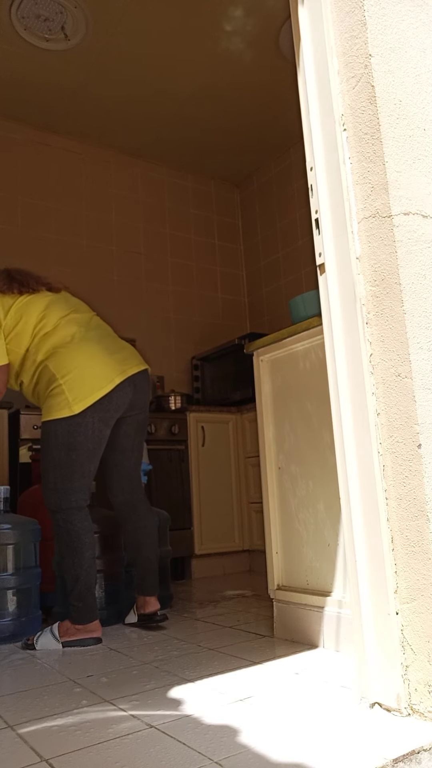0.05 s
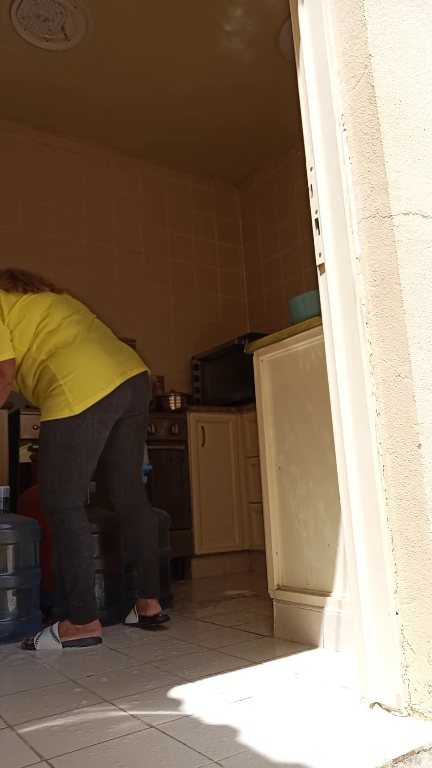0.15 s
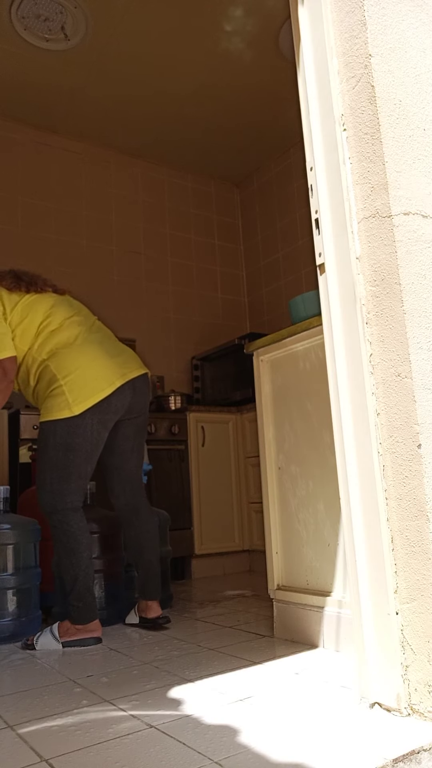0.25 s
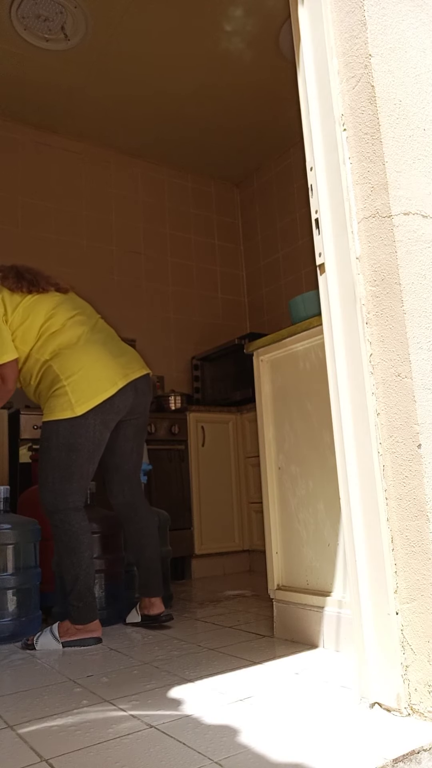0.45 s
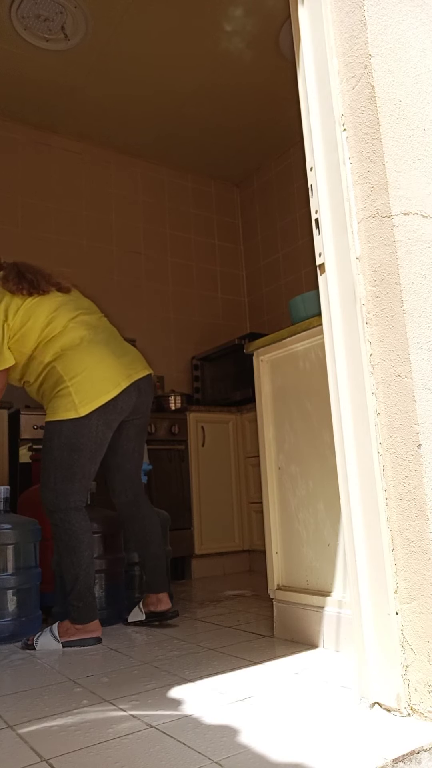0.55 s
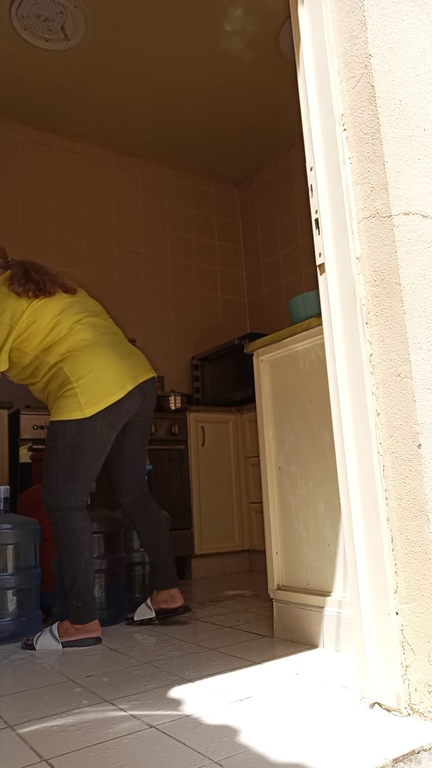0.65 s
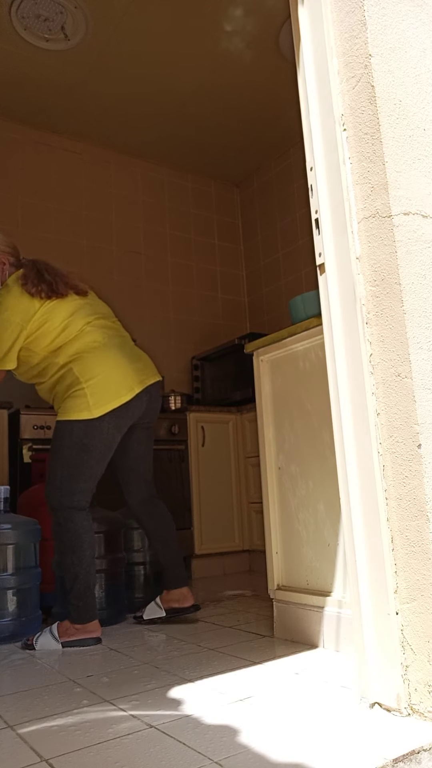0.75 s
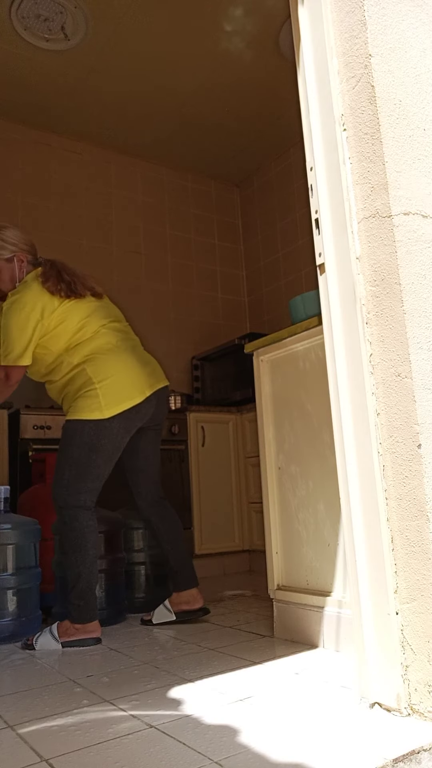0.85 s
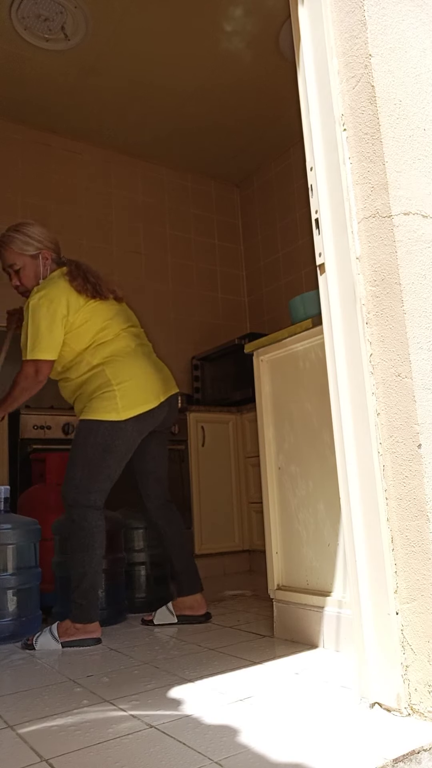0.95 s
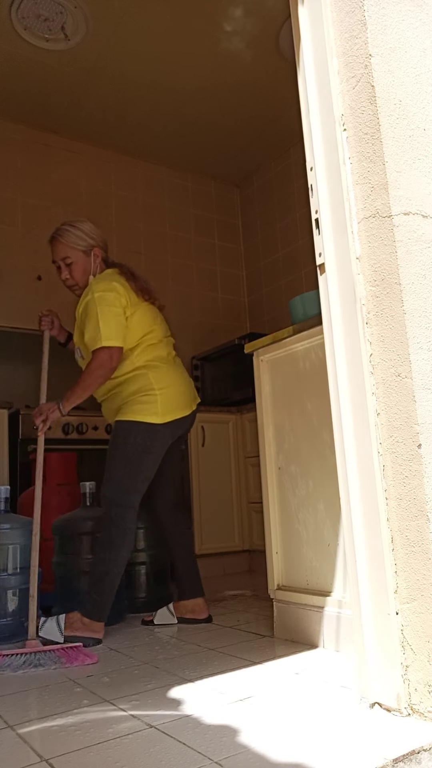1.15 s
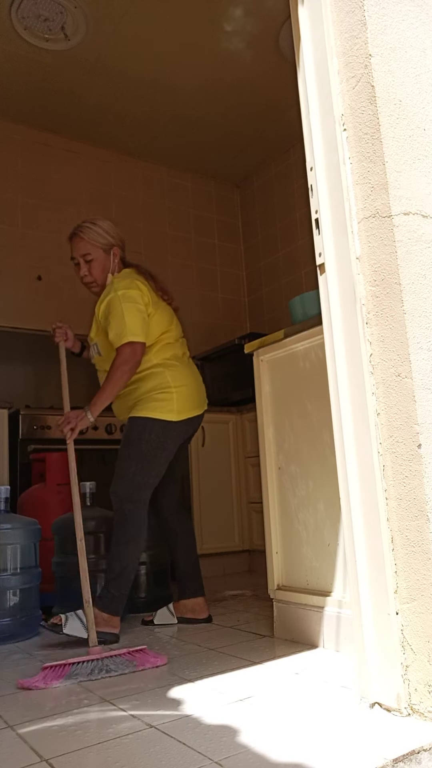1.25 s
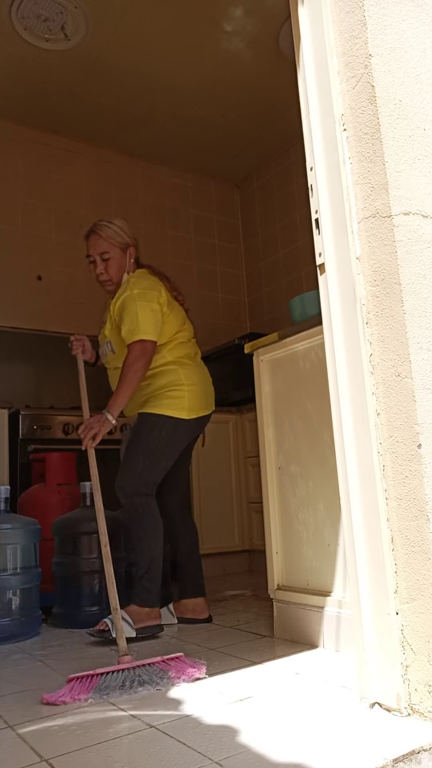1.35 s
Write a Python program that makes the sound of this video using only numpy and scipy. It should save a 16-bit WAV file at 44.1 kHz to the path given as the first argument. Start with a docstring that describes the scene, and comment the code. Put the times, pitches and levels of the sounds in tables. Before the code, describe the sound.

One hard, hollow knock, probably a broom striking a cabinet, lands at about 0.25 seconds and echoes through a tiled kitchen for half a second. Quiet sweeping and soft thuds surround it. A faint squeak comes near 0.75 seconds; the swish dips, then returns with light thuds and scuffs around 1.2 seconds. An appliance hum and hiss continue throughout, with nearly everything heard on the left.

```python
"""In a tiled kitchen, bristles swish over the floor above an appliance hum and hiss, with soft thuds.
At 0.25 s comes one hard, hollow knock, probably the broom head striking a cabinet: the panel rings
and the room answers with a long flutter. Near 0.75 s there is a faint squeak and another thud.
The swish dips briefly, then returns with more thuds and scuffs. All along, the right microphone
is muffled, so nearly everything is heard on the left."""
import sys
import numpy as np
from scipy import signal
from scipy.fft import rfft, irfft
from scipy.io import wavfile
from scipy.ndimage import uniform_filter1d

SR = 44100
rng = np.random.default_rng(int(sys.argv[2]) if len(sys.argv) > 2 else 0)


def to_wav(sig):
    """Store sig (one row per channel, or 1-D mono) as 16-bit WAV at the path in sys.argv[1].

    Samples outside -1..1 are clipped; the rate is SR.
    """
    pcm = np.clip(np.atleast_2d(sig), -1, 1) * 32767
    pcm = np.round(pcm).astype(np.int16)
    wavfile.write(sys.argv[1], SR, pcm.T)  # frames by channels


N = 61739  # samples: 1.4 s
KNOCK_S, CONTACT_S = .2455, 0.00042  # when the blow lands, and how fast it reaches full strength


# The panel's own notes; a fade time (t60) is how long a sound takes to drop by 60 dB.
# (pitch [Hz], relative level [dB], fade time [s])
PANEL_NOTES = [(115.6, -15, 0.13), (474, -30, 0.16), (514.6, 0, 0.14), (550.4, -0.5, 0.14),
               (719.6, -5, 0.13), (814, -12, 0.071), (993, -25, 0.3), (1197, -15.5, 0.15),
               (2189, -19.5, 0.27), (7550, -27, 0.23)]

def panel_ring():
    """The struck cabinet panel shakes at several pitches at once, which sounds hollow."""
    age = clock() - KNOCK_S
    notes = sum(undb(db) * np.sin(2 * np.pi * hz * age) * strike(KNOCK_S, CONTACT_S, t60)
                for hz, db, t60 in PANEL_NOTES)
    return undb(-7) * notes


# Tone of the blow and its first echoes: (frequency [Hz], relative level [dB])
CRACK_TONE = [(40, -26), (150, -7), (350, -4.5), (700, 12), (850, 4.5), (1200, -1), (2100, -9), (2700, -21),
              (3500, -26.5), (5000, -23), (15000, -41)]

def crack():
    """The hard contact gives a sharp burst of noise."""
    return undb(-10.5) * noise(CRACK_TONE) * strike(KNOCK_S, CONTACT_S, t60=0.083)


# Tone of the rattle: (frequency [Hz], relative level [dB])
RATTLE_TONE = [(2000, -58), (4200, 1), (5200, -23), (6500, 7), (7200, -3), (7550, 12.5), (8000, -1),
               (12000, -9), (15500, -13)]

def rattle():
    """A bright rattle follows just behind the blow."""
    return undb(-22) * noise(RATTLE_TONE) * strike(KNOCK_S + .002, rise=.005, t60=0.14)


ROOM_RISE_S, TAIL_HOLD_S, HOLD_DROP_DB_PER_S = 0.0085, 0.16, 58
# Tone of the room's echo: (frequency [Hz], relative level [dB])
ROOM_TONE = [(50, -42), (110, -4.5), (160, -10), (225, 6), (290, -3), (450, -0.5), (560, 3), (780, -0.5),
             (950, -4), (1300, -5.5), (2100, -9), (2900, -16.5), (4200, -19), (5200, -30), (6400, -17),
             (7600, -16), (8400, -27.5), (12000, -46), (15500, -51)]
# How the room dies away after the hold: (frequency [Hz], fade time [s])
ROOM_FADES = [(150, 0.77), (500, 0.53), (1500, 0.58), (7000, 0.55)]

def room_echo():
    """Echoes off the tiles blur into noise, and each range of pitch fades at its own speed."""
    spectrum, echo = rfft(noise(ROOM_TONE)), 0
    for centre, t60 in ROOM_FADES:
        band = read_curve([(hz, hz == centre) for hz, _ in ROOM_FADES], frequencies())
        echo = echo + irfft(spectrum * band, N) * room_fade(t60)
    return undb(-17) * echo


def room_fade(t60):
    """The knock's tail builds up, is held up briefly as the recorder's gain recovers, then dies faster."""
    age = np.maximum(clock() - KNOCK_S, 0)
    build_up = np.minimum(age / ROOM_RISE_S, 1)
    hold = undb(-HOLD_DROP_DB_PER_S * np.minimum(age, TAIL_HOLD_S))
    return build_up * hold * die_away(np.maximum(age - TAIL_HOLD_S, 0), t60)


# Notes that ring between the walls: (pitch [Hz], level [dB])
ROOM_NOTES = [(160, -27.5), (354, -29.5), (432, -27), (466, -26), (517, -25), (546, -26), (567, -23.5),
              (656, -33), (694, -25), (728, -31.5), (767, -25.5), (875, -31.5), (1058, -32)]

def standing_waves():
    """Sound bouncing between the walls rings at certain pitches and fades with the room."""
    age, waves = clock() - KNOCK_S, 0
    for hz, db in ROOM_NOTES:
        note = np.sin(2 * np.pi * (hz * age + rng.random()))
        waves = waves + undb(db) * note * room_fade(read_curve(ROOM_FADES, hz))
    return waves


def room_boom(hz=229, pulses_per_s=10):
    """A low boom in the room pulses as it fades."""
    age = clock() - KNOCK_S
    pulsing = np.sin(np.pi * pulses_per_s * age)
    return undb(-16.5) * np.sin(2 * np.pi * hz * age) * pulsing * room_fade(t60=0.42)


# Tone of bristles on tiles: (frequency [Hz], relative level [dB])
BRISTLE_TONE = [(300, -4), (900, 0.5), (1700, -0.5), (2700, -6), (3900, 0.5), (4650, 0.5), (4900, -6.5),
                (5900, -4), (6200, 3), (7500, 6.5), (8400, 0), (12000, -11.5), (15500, -9)]
# Loudness of the sweeping: (time [s], level [dB])
SWEEP_LEVELS = [(0, -45.5), (.06, -44.5), (.15, -42.5), (.22, -42), (.3, -40.5), (.45, -45), (.56, -45),
                (0.679, -44.5), (.75, -49), (0.821, -57), (0.881, -54.5), (.95, -49), (1.05, -47.5),
                (1.12, -47), (1.19, -42.5), (1.23, -43.5), (1.27, -41.5), (1.35, -40), (1.4, -42.5)]

def bristles(flicker_db=0.9):
    """Bristles rub over the floor, and their hiss rises and falls with the stroke."""
    stroke_db = np.interp(clock(), *np.array(SWEEP_LEVELS).T)
    level_db = stroke_db + flicker_db * wobble(83)
    return noise(BRISTLE_TONE) * undb(level_db)


# Light scuffs of the broom: (time [s], level [dB], fade time [s])
SCUFF_HITS = [(0.126, -44.5, .2), (1.189, -36, 0.057), (1.256, -43, 0.22)]
# Tone of a scuff: (frequency [Hz], relative level [dB])
SCUFF_TONE = [(80, -12), (280, 7), (600, 4.5), (1200, 4.5), (2200, -1.5), (5000, -23), (15000, -32)]

def scuffs():
    """The broom catches on the floor, each time with a dull puff of noise."""
    catches = sum(undb(db) * strike(start, rise=0.0012, t60=t60) for start, db, t60 in SCUFF_HITS)
    return noise(SCUFF_TONE) * catches


# Bumps of feet and broom: (time [s], pitch [Hz], level [dB], time to swell or shrink [s])
THUD_HITS = [(.0977, 117, -24, 0.0082), (.1275, 173, -22, 0.0017), (.149, 100, -27, 0.0089),
             (0.748, 94.6, -34.5, 0.044), (1.075, 91, -34.5, 0.0061), (1.101, 101, -30.5, 0.0063),
             (1.186, 120, -28, 0.0082), (1.198, 125, -22.5, 0.0047)]

def thuds(low_cut_hz=60.3):
    """Each soft contact makes a short bump of bass."""
    bumps = 0
    for peak_s, hz, db, width_s in THUD_HITS:
        age = clock() - peak_s
        bumps = bumps + undb(db) * np.cos(2 * np.pi * hz * age) * np.exp(-abs(age) / width_s)
    low_cut = signal.butter(2, low_cut_hz, "high", fs=SR, output="sos")
    return signal.sosfiltfilt(low_cut, bumps)


SQUEAK_S, SQUEAK_LENGTH_S, SQUEAK_RISE_S = 0.736, 0.13, 0.025
SQUEAK_HZ, SQUEAK_SWELL_DB = 2530, 8

def squeak():
    """A thin squeak slides up to pitch, swells, sags as it breaks off, and lingers in the room."""
    age = clock() - SQUEAK_S
    from_ends = np.maximum(np.minimum(age, SQUEAK_LENGTH_S - age), 0)
    sag = .02 * np.exp(-from_ends / 0.0075)  # 2% lower at both ends
    hz = SQUEAK_HZ * (1 + 0.0022 * wobble(120) - sag)
    fade_in = np.clip(age / SQUEAK_RISE_S, 0, 1)
    swell = undb(SQUEAK_SWELL_DB * np.minimum(age / SQUEAK_LENGTH_S - 1, 0))
    fade_out = die_away(np.maximum(age - SQUEAK_LENGTH_S, 0), t60=.025)
    loudness = undb(-49.5 + 4.4 * wobble(110)) * fade_in * swell * fade_out
    tone = loudness * np.sin(2 * np.pi * np.cumsum(hz) / SR)
    echo = signal.fftconvolve(tone, echo_pattern(ROOM_RISE_S, t60=0.97))[:N]
    return tone + undb(-2.5) * echo


# Notes of the hum: (pitch [Hz], level [dB])
HUM_NOTES = [(100, -61), (195, -43.5)]

def appliance_hum(waver_db=2.56):
    """An appliance hums on two low notes that waver in loudness and slightly in pitch."""
    hum = 0
    for hz, db in HUM_NOTES:
        loudness = undb(db + waver_db * wobble(8.7))
        hum = hum + loudness * np.sin(2 * np.pi * hz * clock() + 0.53 * wobble(9.7))
    return hum


# Tone of the kitchen's background noise: (frequency [Hz], relative level [dB])
BACKGROUND_TONE = [(25, -45), (50, -27), (90, 1), (140, -1), (200, -3.5), (260, -4.5), (340, -7),
                   (420, -13), (600, -12), (1200, -22.5), (2200, -25), (3000, -29), (4500, -34),
                   (5200, -50), (6500, -30), (7600, -30.5), (8500, -34), (12000, -41.5), (15500, -41)]

def background_noise(flicker_db=.5):
    """A low rumble and a faint hiss carry on almost steadily."""
    return noise(BACKGROUND_TONE) * undb(-42 + flicker_db * wobble(5.1))


# How much the muffled microphone lets through: (frequency [Hz], gain [dB])
MUFFLING = [(60, -40), (200, -11.5), (400, -23.5), (800, -17.5), (1200, -31), (2100, -27), (3000, -32),
            (5000, -25.5), (7500, -57), (14000, -37)]
# Tone of its own hiss: (frequency [Hz], relative level [dB])
MIC_HISS_TONE = [(100, 23), (1000, 10.5), (4000, 2.5), (5000, -3), (7000, 0.5), (8500, -14), (12000, -10.5),
                 (15000, 5.5)]

def muffled_microphone(sound, delay_s=0.000864, smear_ratio=2.4):
    """The right microphone hears the kitchen late, smeared and dull, and adds its own hiss."""
    delayed = np.exp(-2j * np.pi * frequencies() * delay_s)
    smeared = rfft(echo_pattern(rise=0.0005, t60=0.027))
    blend = (delayed + smear_ratio * smeared) / np.hypot(1, smear_ratio)
    dulling = undb(read_curve(MUFFLING, frequencies()))
    return irfft(rfft(sound) * blend * dulling, N) + undb(-61.5) * noise(MIC_HISS_TONE)


def undb(db):
    """Turn decibels into a number to multiply by."""
    return 10 ** (np.asarray(db) / 20)


def clock():
    """Time of every sample in seconds."""
    return np.arange(N) / SR


def frequencies():
    """Frequency of every point of the spectrum in Hz."""
    return np.arange(N // 2 + 1) * SR / N


def read_curve(points, hz):
    """Read between (frequency, value) points, giving every octave the same width."""
    point_hz, values = np.array(points, float).T
    return np.interp(np.log(np.maximum(hz, 1)), np.log(point_hz), values)


def noise(tone):
    """Noise of average strength 1, its lows and highs shaped by a tone table."""
    phases = np.exp(2j * np.pi * rng.random(N // 2 + 1))
    shaped = irfft(phases * undb(read_curve(tone, frequencies())), N)
    return shaped / shaped.std()


def wobble(rate):
    """Smooth random drift of typical size 1, changing about `rate` times a second."""
    width = max(int(SR / rate), 1)
    drift = rng.standard_normal(N)
    for _ in range(2):
        drift = uniform_filter1d(drift, width, mode="wrap")
    return drift / drift.std()


def die_away(age, t60):
    """Loudness that drops by 60 dB every t60 seconds."""
    return np.exp(-np.log(1000) * age / t60)


def strike(start, rise, t60):
    """Loudness of a hit: it climbs, then dies away. All times are in seconds."""
    age = np.maximum(clock() - start, 0)
    return np.minimum(age / rise, 1) * die_away(age, t60)


def echo_pattern(rise, t60):
    """A dense, fading run of random echoes with a total energy of 1."""
    echoes = rng.standard_normal(N) * strike(0, rise, t60)
    return echoes / np.linalg.norm(echoes)


def scene():
    """The left microphone hears the kitchen openly; the right one hears it muffled."""
    knock = panel_ring() + crack() + rattle()
    room = room_echo() + standing_waves() + room_boom()
    sweeping = bristles() + scuffs() + thuds()
    left = knock + room + sweeping + squeak() + appliance_hum() + background_noise()
    return np.array([left, muffled_microphone(left)])


PEAK_LIMIT, TOP_HZ = 0.88, 15750
DIP_LOW_HZ, DIP_HIGH_HZ, DIP_SLOPE_HZ, DIP_DB = 8430, 11590, 560, -24

def record(dry):
    """The recorder rounds the highest peaks, has a deep dip in the left treble and cuts the top."""
    hz = frequencies()
    rounded = dry / (1 + (dry / PEAK_LIMIT) ** 4) ** .25
    left_db = DIP_DB * np.clip((hz - DIP_LOW_HZ) / DIP_SLOPE_HZ, 0, 1) * (hz < DIP_HIGH_HZ)
    treble_dip = undb([left_db, np.zeros_like(hz)])
    top_cut = 1 / np.sqrt(1 + (hz / TOP_HZ) ** 600)
    return irfft(rfft(rounded) * treble_dip * top_cut, N)


dry = scene()
out = record(dry)
to_wav(out)
```